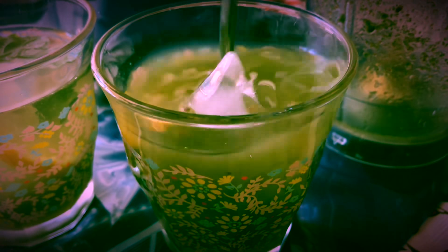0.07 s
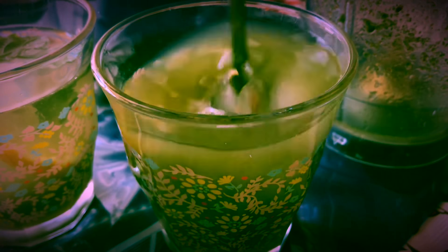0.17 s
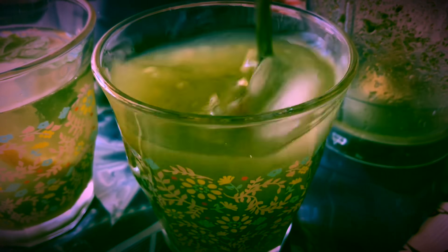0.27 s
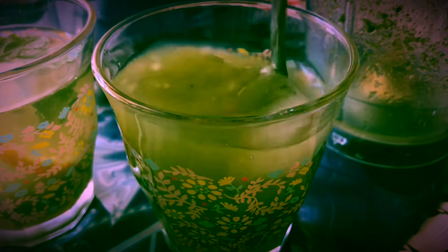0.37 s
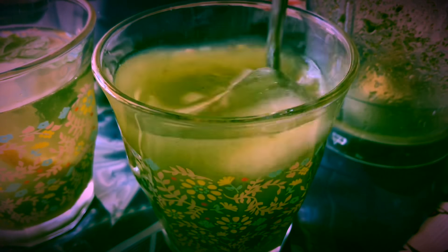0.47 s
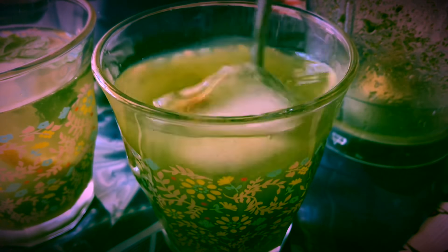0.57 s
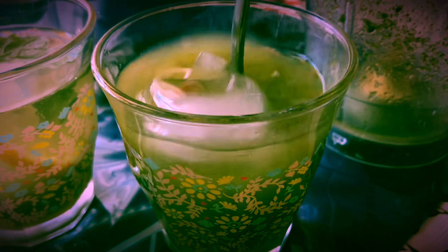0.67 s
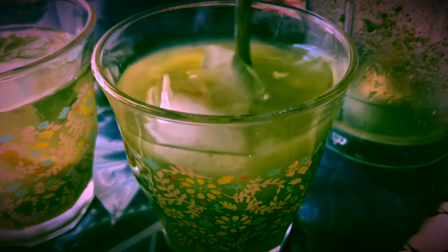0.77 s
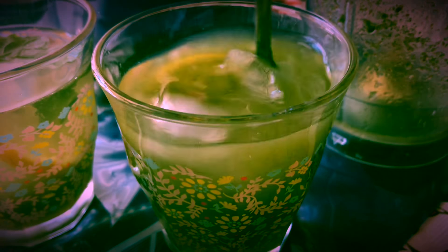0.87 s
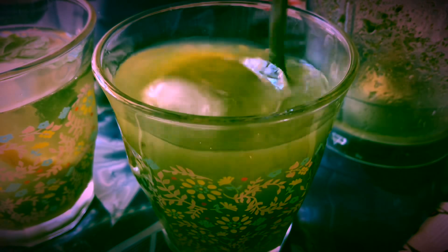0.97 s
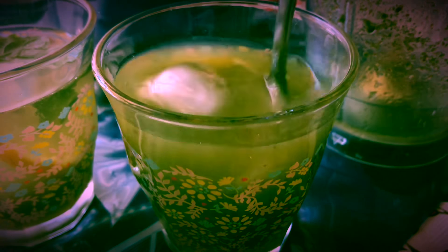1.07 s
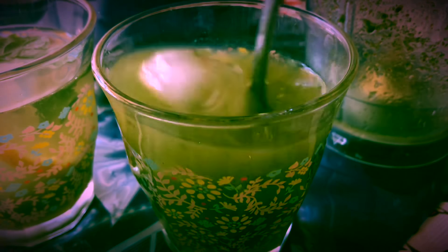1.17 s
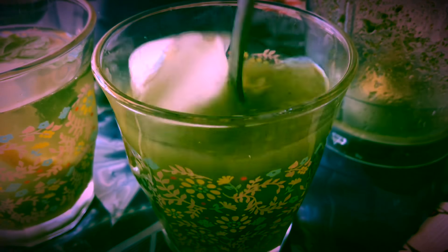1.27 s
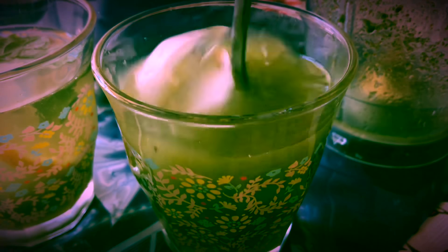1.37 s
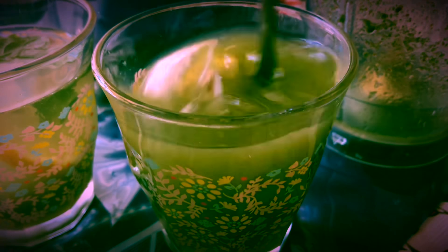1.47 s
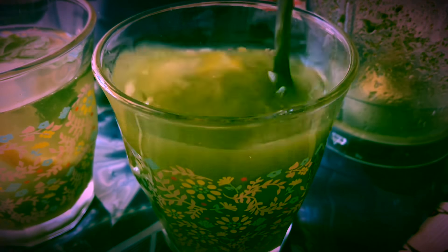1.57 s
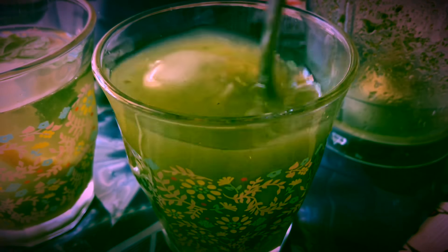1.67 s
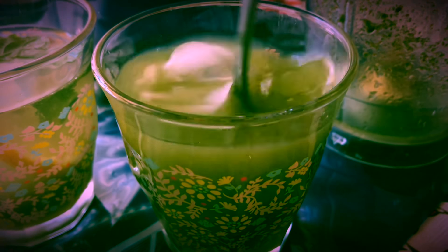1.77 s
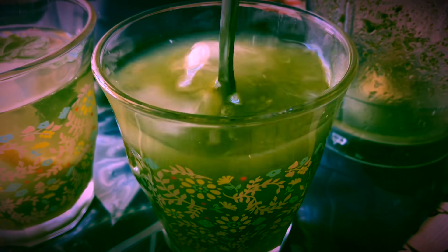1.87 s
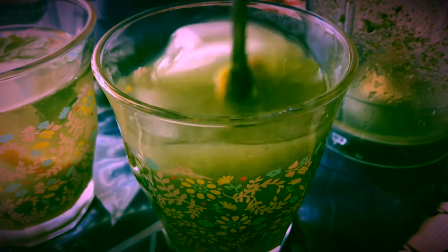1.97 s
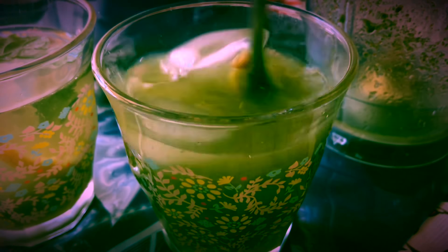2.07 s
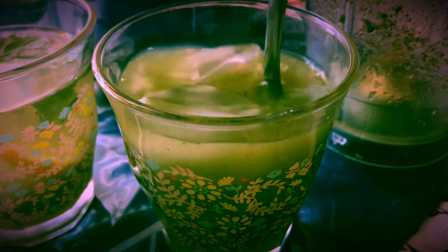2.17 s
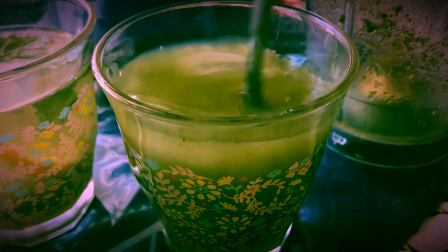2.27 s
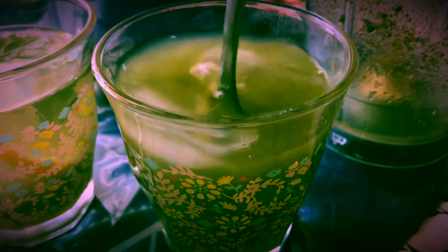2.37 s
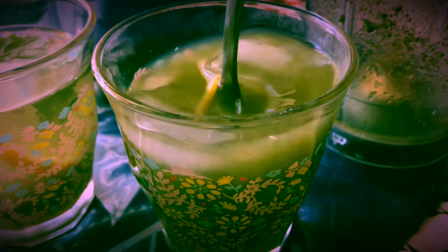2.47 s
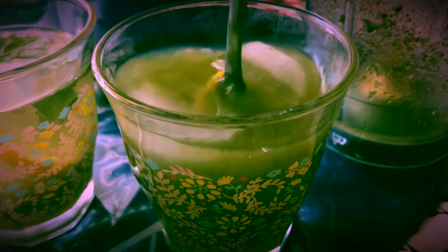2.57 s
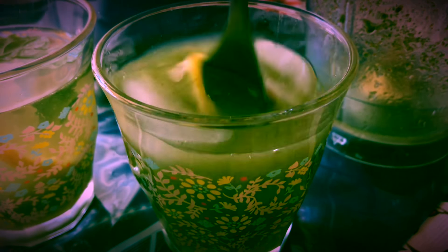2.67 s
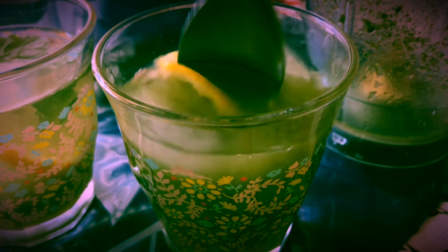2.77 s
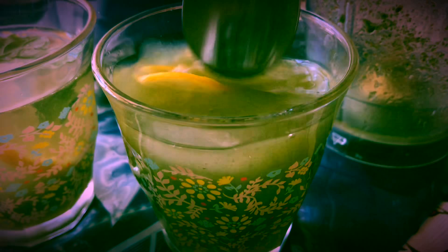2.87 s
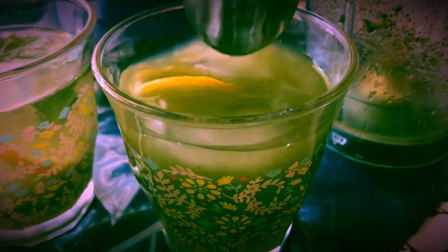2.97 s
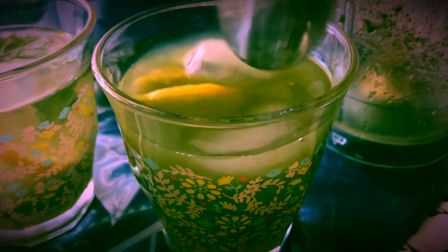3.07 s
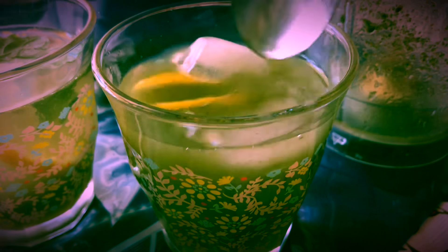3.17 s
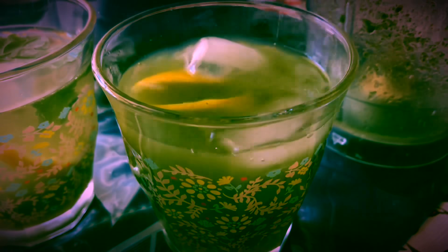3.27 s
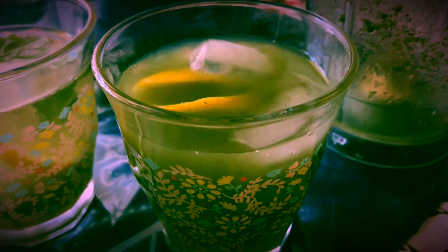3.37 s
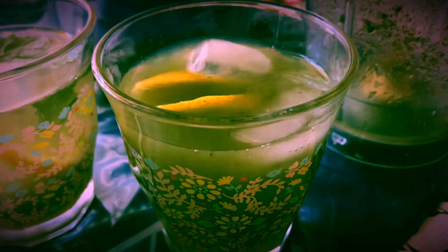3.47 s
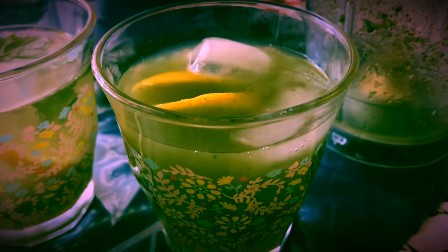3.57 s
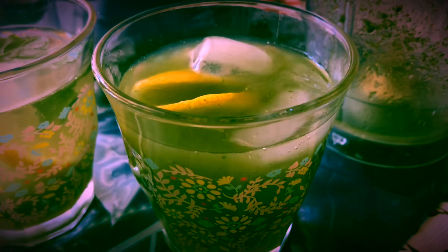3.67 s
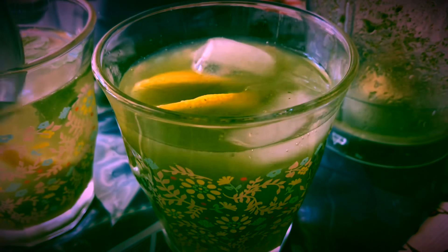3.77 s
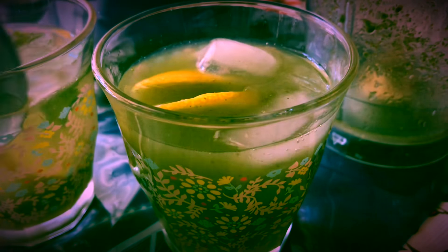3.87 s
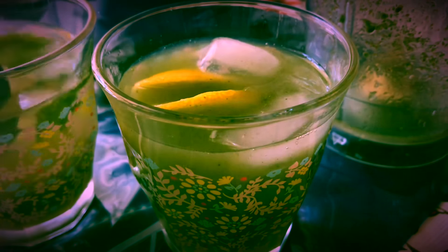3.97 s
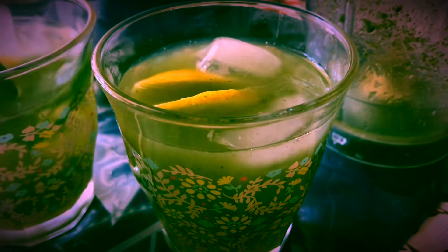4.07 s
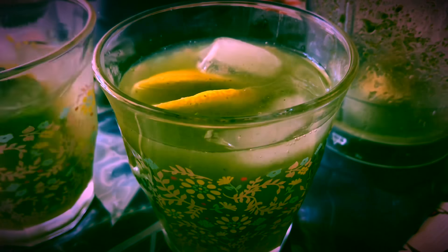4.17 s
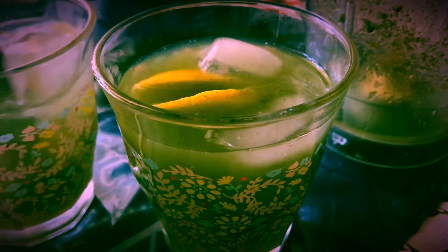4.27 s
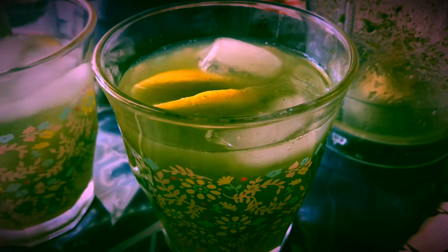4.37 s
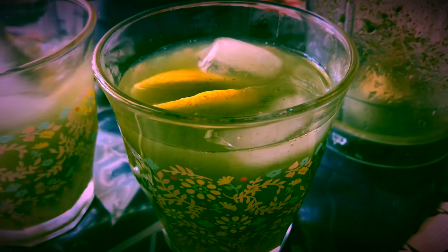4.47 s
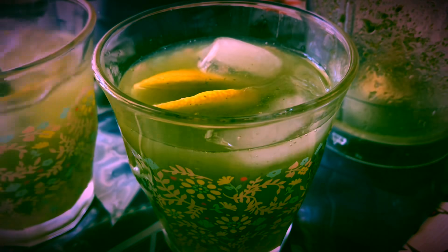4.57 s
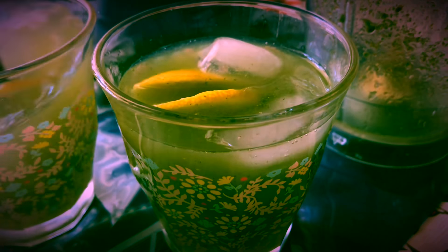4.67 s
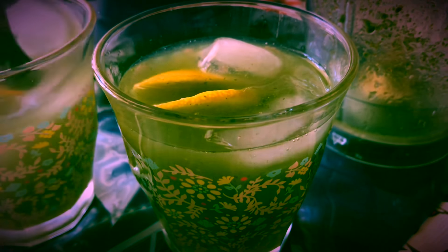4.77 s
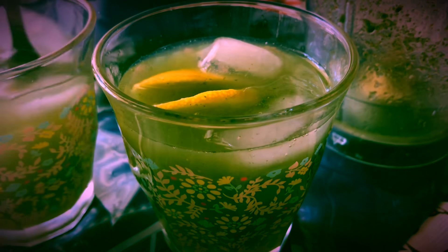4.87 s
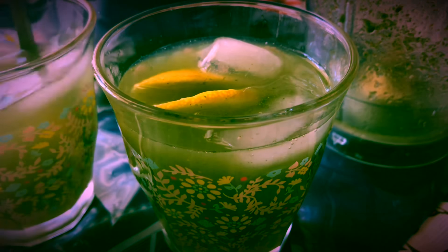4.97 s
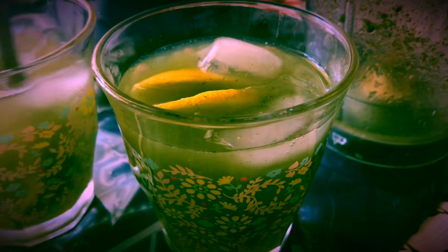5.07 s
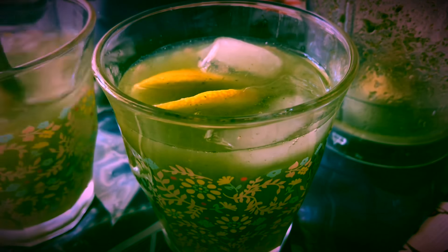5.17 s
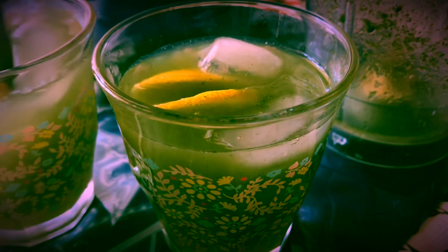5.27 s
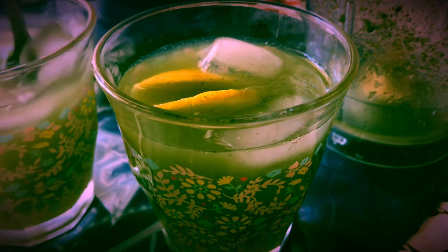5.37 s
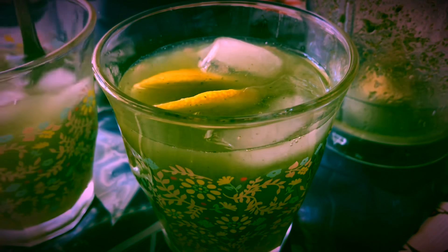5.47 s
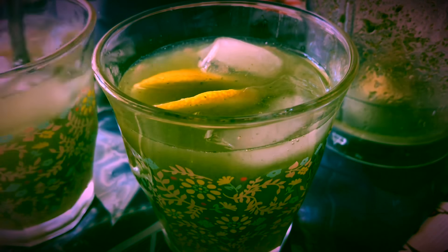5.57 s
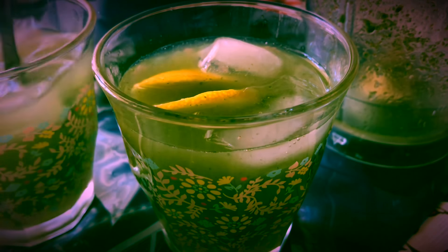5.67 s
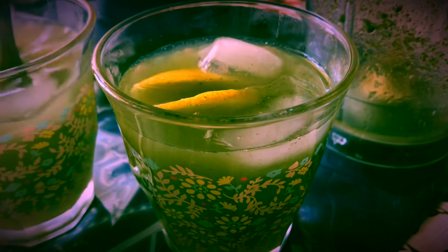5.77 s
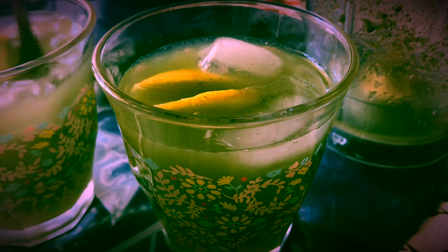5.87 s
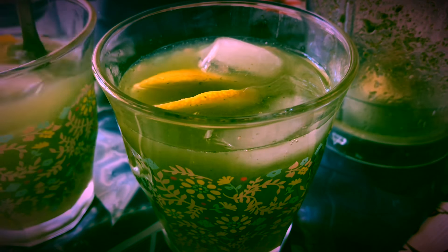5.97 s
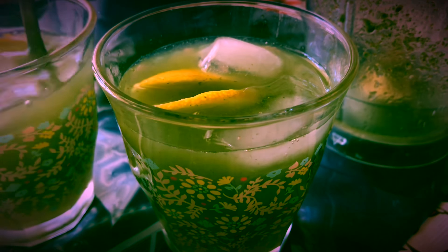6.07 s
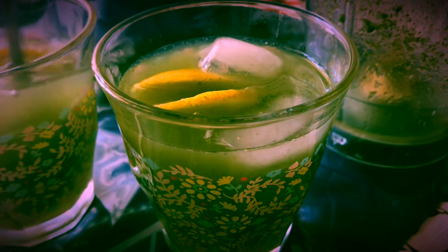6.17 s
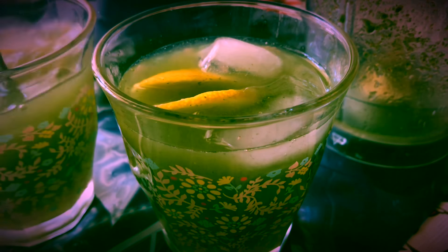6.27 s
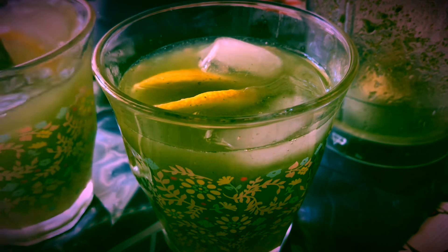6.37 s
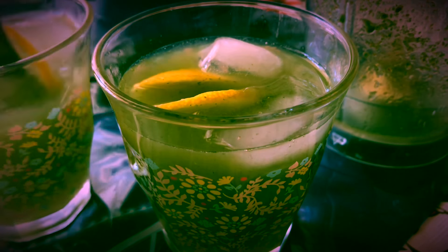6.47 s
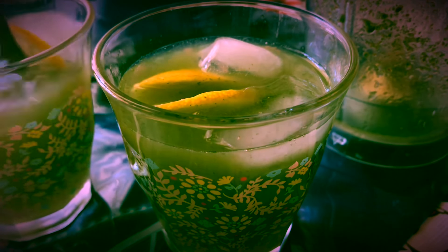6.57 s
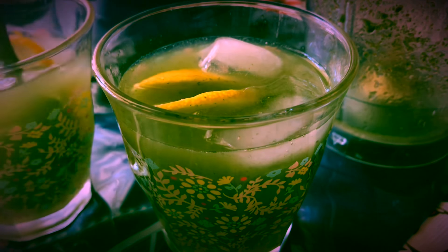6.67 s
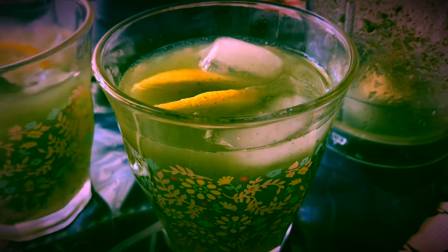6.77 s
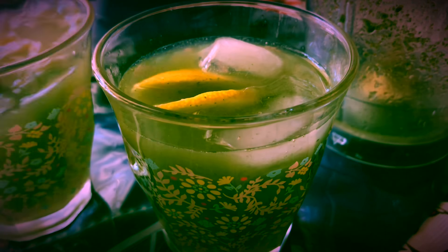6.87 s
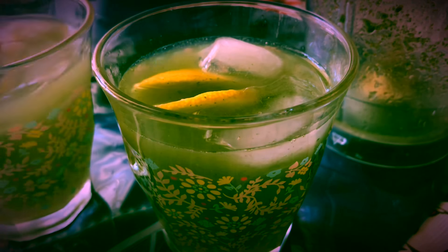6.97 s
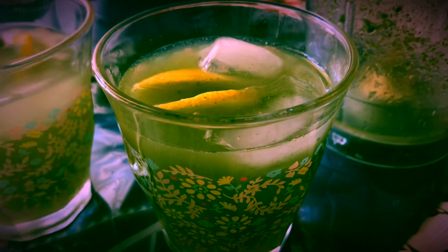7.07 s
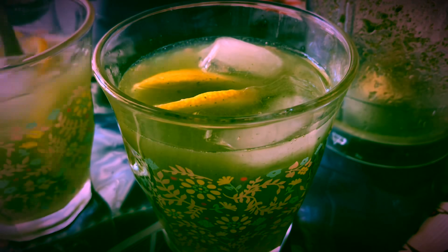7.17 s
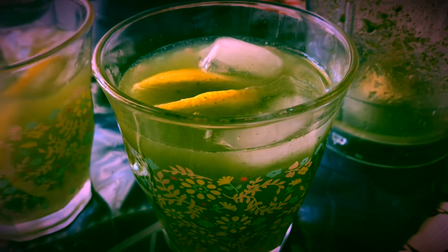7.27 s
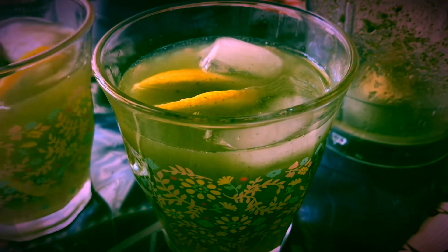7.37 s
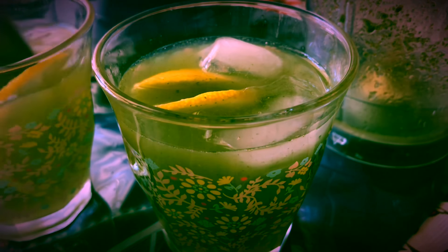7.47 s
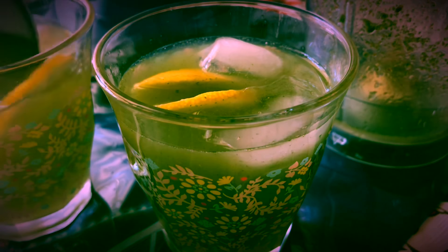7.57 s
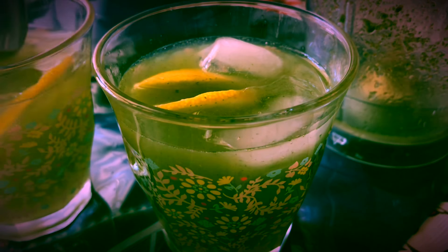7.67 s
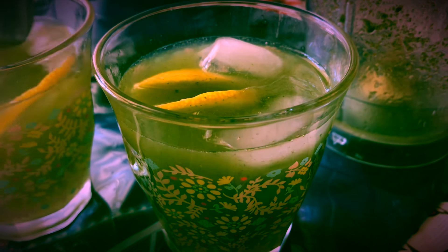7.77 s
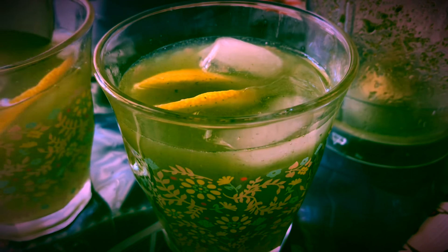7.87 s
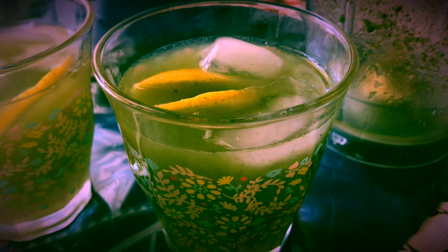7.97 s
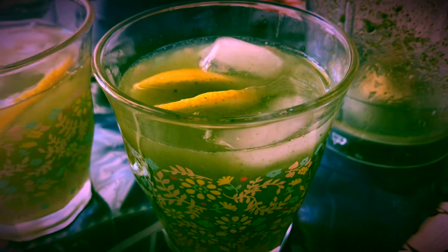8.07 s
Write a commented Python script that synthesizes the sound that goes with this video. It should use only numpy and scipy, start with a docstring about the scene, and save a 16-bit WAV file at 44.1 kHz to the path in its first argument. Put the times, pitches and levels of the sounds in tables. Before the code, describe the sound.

Close up in a small kitchen, a metal spoon stirs ice in a full glass tumbler. Sparse hard cracks and dull, short clinks mix with faint ice ticks and a few watery gulps. After about three seconds the stirring nearly stops; at four seconds sharp clinks begin again and become dense and irregular, softening toward the end. Short room echoes and low, quiet hum lie behind.

```python
"""Dry cracks of a spoon and ice cubes in a full glass tumbler are heard first, in a small kitchen.
Each knock sums bursts of band-passed noise, a brief note of ice or spoon, and damped modes of spoon and wall.
Rising sine bubbles make the drink gulp and drip; short touches of a few modes make the cubes tick.
Decaying echoes answer from the room, over shaped noise and the narrow hum of an appliance."""
import sys
import numpy as np
from scipy import signal
from scipy.fft import rfft, irfft
from scipy.io import wavfile

SR = 44100
rng = np.random.default_rng(int(sys.argv[2]) if len(sys.argv) > 2 else 0)


def persist_wave(psi):
    """Save psi, clipped to +-1, as 16-bit WAV."""
    counts = np.round(np.clip(psi, -1, 1) * 32767).astype(np.int16)
    wavfile.write(sys.argv[1], SR, np.atleast_2d(counts).T)


N = 357210

# Clear knocks of spoon, ice and glass. Each row: start in seconds, level in dB, then thud (weight),
# crack (hardness) and ring of the wall, each in dB relative to the level, and note of ice or spoon in Hz.
KNOCKS = [(0.0121, -28.5, -2.5, 1.5, -35, 6050), (0.0587, -42, -4, -16, -17, 1280),
          (0.0944, -37, 1, -15, -12, 980), (0.2195, -43, 1, -6, -2, 4220),
          (0.2272, -40.5, 2, -13, -17, 3870), (0.2485, -24, 1, -10, -11, 2510),
          (0.2691, -35, -8, -9, -22, 2510), (0.3516, -24.5, -3, -3, -32, 1615),
          (0.4622, -45.5, -1, -10, -9, 950), (0.5827, -44.5, 7, -11, -7.5, 2740),
          (0.6289, -45, 7, -4, -8, 1280), (0.7627, -14, -7, -2.5, -41, 4250),
          (0.9395, -51, 9, -8, -19, 3720), (1, -44.5, 12, -2.5, -27, 1290),
          (1.1711, -40, -3, 4.5, -2.5, 1190), (1.2586, -40, 10, -16, -10, 930),
          (1.3108, -25, -14, -13, -11, 4070), (1.3292, -27.5, -4, -10, -23, 3680),
          (1.354, -42, 7, 0, -18, 3840), (1.3792, -21, -5, -1.5, -28, 2270),
          (1.4904, -37.5, -4.5, -2.5, -7, 4040), (1.865, -31, -4, -8.5, -12, 4000),
          (1.8758, -29, -9, -24, -11.5, 960), (1.9263, -16.5, -8, -7.5, -17.5, 4070),
          (1.991, -36, -15, -8, -10, 3920), (2.0503, -40, -4.5, -10, -5.5, 3710),
          (2.1121, -46, 0, -12, -9, 895), (2.2049, -17, -3, -1, -9, 2460),
          (2.3389, -34, 3, -6.5, -18, 2530), (2.4175, -36, 7, -3.5, -6, 920),
          (2.4638, -34.5, -15, -9, -4, 3600), (2.475, -33, -1, -16, -8, 990),
          (2.5112, -40, -12, -7, -9, 4030), (2.638, -42.5, 7, -3, 1, 3900),
          (2.7756, -39.5, -19.5, -7.5, -17, 3500), (3.1659, -37.5, 4.5, -7.5, -6, 1210),
          (3.306, -44, -17, -11, -5.5, 3900), (3.355, -48, -5, -13, -6.5, 2560),
          (3.436, -46.5, -7, -8, 3, 2450), (4.0497, -17.5, -27, -2.5, -18.5, 4470),
          (4.1099, -37, -26, -5.5, -4, 4540), (4.2029, -22, -15, -1.5, -6, 4030),
          (4.293, -27.5, -5.5, 3.5, -16, 3450), (4.3459, -36.5, 0, -5, -7, 4260),
          (4.396, -35.5, -9, -3, -5.5, 4070), (4.4022, -40.5, 2, -2, -4, 4100),
          (4.5178, -41.5, -19, -15, -4, 2750), (4.626, -20, -7, 2.5, -10.5, 4080),
          (4.7633, -32, -24, -6, -13, 2450), (4.811, -30, 4, -9.5, -13, 2460),
          (4.8247, -40, -10, -7, -3, 3950), (4.8503, -36, -5, -5, -2, 945),
          (4.864, -25.5, -2, 1.5, -16, 1000), (4.871, -29.5, -3, -7, -11, 1010),
          (4.8868, -32.5, -22, 3, -9, 4200), (4.917, -25.5, -27, -2.5, -1.5, 1650),
          (4.947, -37, -8, -14, -16, 2680), (4.9551, -40.5, -4, -14, -3, 2780),
          (5.069, -38, -33, -27, -27, 3380), (5.1077, -29, -30, -19.5, -11, 4040),
          (5.135, -40, -19, -21, -29, 3560), (5.2081, -40, -29, -2.5, -19, 4430),
          (5.2685, -37, -1, -16, -1.5, 2730), (5.3064, -28.5, -15, -16, -8.5, 2640),
          (5.328, -36, 5, -14, -2, 4140), (5.3425, -38, -2, -5.5, -0.5, 4230),
          (5.39, -39, -19, -8, -13, 4180), (5.3968, -35.5, -17, -13, -7, 4260),
          (5.4356, -23, -2, -1, -12, 2390), (5.4662, -38, -13, -4, -5, 4260),
          (5.5442, -32, -28, -15, -24, 4240), (5.636, -28, -9.5, -5.5, -14.5, 3760),
          (5.6627, -44, -7, -6, -4, 4100), (5.7056, -43, 7, 1.5, 4, 2910),
          (5.767, -35, -27, 9.5, -20, 9130), (5.804, -38.5, -27, 5.5, -12, 3950),
          (5.975, -32, -7, -15.5, -8.5, 4120), (6.046, -52, -4, 3, 4, 980),
          (6.17, -23, -2, -9.5, -15, 2240), (6.1748, -31.5, -2, -5, -12, 3650),
          (6.1878, -27, -5.5, -9.5, -15, 2520), (6.3181, -43.5, -14, 4, -15, 2660),
          (6.327, -30, 3.5, -0.5, -6.5, 2550), (6.3523, -37.5, -17, 8.5, -18, 6400),
          (6.523, -40.5, -18.5, -4.5, -1.5, 3900), (6.6227, -49, -6.5, -14, -4, 4180),
          (6.7359, -41.5, -3, -26, -18, 1000), (6.8, -20, -4.5, 3.5, -9.5, 2360),
          (6.823, -25.5, -7.5, 1.5, -9, 4070), (6.8586, -26.5, -3, -7.5, -11, 2560),
          (6.8988, -33, -13, -10, -6, 1080), (6.9903, -57.5, -4, 15, 7, 7200),
          (7.0529, -48.5, -11, -5, -14, 4800), (7.0748, -41.5, -20, -12, -11.5, 3900),
          (7.158, -46, -16, 12.5, 0, 4200), (7.1675, -34.5, 0, -25, -18, 1010),
          (7.2443, -40.5, 6, -7, -8.5, 950), (7.285, -38, -10, -6.5, -4, 4100),
          (7.3092, -34, 1, -11, -3.5, 4570), (7.343, -35.5, -9, -7, -10, 5640),
          (7.421, -34.5, -24, -15, -10.5, 4060), (7.4787, -41, 5, -2, 4, 1030),
          (7.4934, -38, -10.5, -17, -11, 4130), (7.5003, -38.5, -3, -11, -12, 4280),
          (7.5437, -47, 2, -24, -7, 3400), (7.657, -44.5, -14, 6, -32, 4300),
          (7.6678, -31.5, -17, -2, -15.5, 4380), (7.7752, -43.5, -21, -6.5, -18, 4120),
          (7.827, -43.5, -18, -7, -22, 4220), (8.0317, -60, -14, 14, -10, 11100)]
# Wall modes of a full tumbler, in close pairs that beat.
# Each row: nominal frequency in Hz, nominal level in dB, nominal t60 in seconds.
GLASS_MODES = [(1777.4, 7, 0.044), (1839, -6.5, 0.086), (4200, -14, .035), (4176, -15, .04)]


def gain_of(db):
    """Level law: converts decibels to amplitude."""
    return 10 ** (np.asarray(db) / 20)


def evened(x):
    """Power normalisation: scales to rms 1."""
    return x / np.sqrt(np.mean(x ** 2) + 1e-20)


def as_blow(x):
    """Energy normalisation: scales to the energy of one millisecond at rms 1."""
    return x * np.sqrt(SR / 1000 / (np.sum(x ** 2) + 1e-20))


def read(points, hz):
    """Logarithmic pitch scale: interpolates a spectrum along log frequency."""
    f, value = np.transpose(points)
    return np.interp(np.log(hz + 1), np.log(f), value)


def add(mix, s, sound):
    """Superposition: mixes a sound in at s seconds."""
    part = mix[max(round(s * SR), 0):][:len(sound)]
    part += sound[:len(part)]


def dying(t, t60):
    """Free decay: exponential, 60 dB down after t60."""
    return np.exp(-np.log(1000) * t / t60)


def band(x, low_hz, high_hz, order=5):
    """Causal band-pass: nothing sounds before its cause, so attacks stay sharp."""
    edges = [low_hz, min(high_hz, SR / 2 - 100)]
    band_pass = signal.butter(order, edges, "band", fs=SR, output="sos")
    return signal.sosfilt(band_pass, x)


def background(floor_db=-49.5):
    """Stationary noise: a shaped floor, with narrow bands of noise as the wavering lines of an appliance."""
    # Room noise and hiss. Each row: frequency in Hz, relative spectral density in dB per Hz.
    floor = [(20, -24.5), (48, 2), (90, -3.5), (200, -8), (340, -7), (450, -15.5), (650, -13), (1500, -25),
             (2600, -35), (5000, -42), (9000, -45), (10300, -48), (12000, -43), (15500, -43.5)]
    # Appliance hum and a thin whine. Each row: frequency in Hz, width in Hz, rms level in dB.
    hum = [(48.3, 7.5, -64.5), (135.95, 5, -63.5), (330.3, 5.1, -66), (501, 2.2, -70), (720, 5.4, -72.5),
           (12710, 200, -80)]
    hz = np.fft.rfftfreq(N, 1 / SR)
    noise = evened(irfft(rfft(rng.standard_normal(N)) * gain_of(read(floor, hz)), N))
    lines = sum(gain_of(db) * evened(np.exp(-2 * ((hz - f) / width) ** 2)) for f, width, db in hum)
    appliance = irfft(rfft(rng.standard_normal(N)) * lines, N)
    return gain_of(floor_db) * noise + appliance


def room_echo(first_s=0.00057, early_db=-17, early_t60=0.13):
    """Reverberation: sparse echoes from counter and jars, and a diffuse tail with a decay set by pitch."""
    # Reverberation of the kitchen. Each row: frequency in Hz, t60 in seconds.
    reverberation = [(400, 0.64), (1500, 0.31), (4000, 0.26), (9000, 0.29), (15000, .13)]
    # Share of each pitch that the room sends back. Each row: frequency in Hz, level in dB.
    returned = [(300, -1.5), (3500, -16.5), (8000, -22), (14000, -20.5)]
    t = np.arange(SR // 2) / SR
    taps = rng.standard_normal((2, len(t))) * (t > first_s)
    hz, at, spectra = signal.stft(taps[0], SR, nperseg=256)
    t60 = read(reverberation, hz)[:, None]
    # the root gives a slow and a fast decay the same energy
    start = gain_of(read(returned, hz))[:, None] * np.sqrt(2 * np.log(1000) / (t60 * SR))
    tail = signal.istft(spectra * start * dying(at, t60), SR, nperseg=256)[1][:len(t)]
    sparse = rng.random(len(t)) < 1500 / SR  # about 1500 echoes a second
    early = taps[1] * sparse * dying(t, early_t60)
    return tail + gain_of(early_db) * early / np.linalg.norm(early)


def kitchen(rings, count=3):
    """Directivity: knocks send a different spectrum towards each wall, so echoes blend into a smooth wash."""
    echoes = []
    for _ in range(count):
        sent = contacts(note_share=0.85) + rings
        echoes.append(signal.oaconvolve(sent, room_echo())[:N])
    return sum(echoes) / np.sqrt(count)


def bubble(hz, t60, rise, cycles=0.16):
    """Bubble resonance: a pocket of air rings and rises in pitch as it nears the surface."""
    t = np.arange(0, t60, 1 / SR)
    phase = 2 * np.pi * np.cumsum(hz * 2 ** (rise * t)) / SR  # rise in octaves a second
    onset = 1 - np.exp(-t * hz / cycles)
    return np.sin(phase) * dying(t, t60) * onset


def drink(ring_cycles=16, rise=4, count=40):
    """Bubble resonance: a few clear bubbles, and clouds of small ones where the spoon drags ice under."""
    # Single bubbles. Each row: start in seconds, starting frequency in Hz, level before decay in dB,
    # t60 in seconds, rise in octaves a second.
    bubbles = [(1.812, 236.5, -33, 0.14, 10.7), (1.856, 328, -34.5, 0.21, 1.1), (2.439, 302, -46, .16, .5),
               (3.163, 1250, -41, 0.063, 2.1), (4.849, 936, -31, 0.061, 6.2),
               (5.929, 4860, -34.5, 0.017, 20), (6.479, 2520, -42.5, 0.03, 1.8)]
    # Swirls of the drink. Each row: start in seconds, length in seconds, rms level over that length in dB,
    # lowest and highest starting frequency in Hz.
    swirls = [(1.805, .095, -46, 407, 1376), (1.858, .18, -64, 255, 900), (2.381, 0.13, -52, 262, 1190),
              (4.794, 0.13, -51, 395, 1530), (5.427, 0.07, -51, 280, 1040), (6.164, 0.066, -50, 176, 670)]
    out = np.zeros(N)
    for s, hz, db, t60, glide in bubbles:
        add(out, s, gain_of(db) * bubble(hz, t60, glide))
    for s, length, db, low_hz, high_hz in swirls:
        cloud = np.zeros(SR // 2)
        for when, size in zip(rng.beta(2, 2, count), rng.random(count)):  # each cloud swells and fades
            hz = low_hz * (high_hz / low_hz) ** size
            add(cloud, when * length, bubble(hz, ring_cycles / hz, rise))
        add(out, s, gain_of(db) * cloud * np.sqrt(length * SR / np.sum(cloud ** 2)))
    return out


def tick(middle_hz=3600, width=.6, tick_t60=0.006, wall_db=-12):
    """Modal excitation: a light touch of a cube rouses a few brief modes of ice and a trace of the wall."""
    t = np.arange(2048) / SR
    wall = sum(gain_of(db) * dying(t, t60) * np.sin(2 * np.pi * hz * t) for hz, db, t60 in GLASS_MODES)
    ice_hz = np.exp(rng.normal(np.log(middle_hz), width, (8, 1))).clip(800, 15000)
    ice = np.sin(2 * np.pi * ice_hz * t).sum(0) * dying(t, tick_t60)
    return as_blow(ice) + gain_of(wall_db) * wall


def jostling(tick_db=-57, spread_db=6.5):
    """Random point process: floating cubes touch each other and the wall in faint ticks."""
    # Jostling while the spoon moves. Each row: time in seconds, mean rate in ticks a second.
    jostle = [(0, 28), (2.5, 24), (2.9, 1.5), (4.05, .7), (4.4, 13), (4.9, 28), (6.3, 20), (7.5, 34),
              (8.1, 8.9)]
    rate, out = np.interp(np.arange(N) / SR, *np.transpose(jostle)), np.zeros(N)
    for at in np.flatnonzero(rng.random(N) < rate / SR):
        level_db = tick_db + spread_db * min(rng.normal(), 2)
        add(out, at / SR, gain_of(level_db) * tick())
    return out


def rebounds(growth=0.35, from_s=0.0044, to_s=0.015, rebound_db=-50, ordinary_knock_db=-29):
    """Rebound: after each knock the cube touches once more, a little harder after a hard one."""
    out = np.zeros(N)
    for s, db, *_ in KNOCKS:
        delay = from_s + (to_s - from_s) * rng.random()
        level_db = rebound_db + growth * (db - ordinary_knock_db)
        add(out, s + delay, gain_of(level_db) * tick())
    return out


def spoon(scatter_db=3):
    """Damped modes: the spoon rings briefly with each knock, each mode by chance a little more or less."""
    # Modes of the spoon. Each row: frequency in Hz, mean level in dB against the knock, t60 in seconds.
    spoon_modes = [(2600, -11.5, 0.02), (5630, -17.5, 0.029), (6320, -33, 0.14)]
    hz, mode_db, t60 = np.transpose(spoon_modes)[:, :, None]
    t, out = np.arange(6000) / SR, np.zeros(N)
    modes = dying(t, t60) * np.sin(2 * np.pi * hz * t)
    for s, db, *_ in KNOCKS:
        strength, side = rng.standard_normal((2, len(spoon_modes), 1))
        gains = gain_of(db + mode_db + scatter_db * strength) * np.sign(side)
        add(out, s, (gains * modes).sum(0))
    return out


def glass(scatter_db=4, slosh=0.014, rise_s=0.0016, damping_db=1):
    """Damped modes: the wall rings after each knock, varied by the point of contact and the sloshing drink."""
    # The drink loads the wall and shifts its modes. Each row: time in seconds, factor on the frequencies.
    loading = [(0, 1), (1.5, 1.01), (2.05, 1), (3.4, 0.98), (4.05, 1.034), (4.4, 1.005), (4.9, 0.99),
               (5.35, 1.012), (5.7, .98), (6.8, 0.99), (7.3, 0.97)]
    hz, mode_db, t60 = np.transpose(GLASS_MODES)[:, :, None]
    t, out = np.arange(6000) / SR, np.zeros(N)
    onset = 1 - np.exp(-t / rise_s)
    for s, db, _, _, ring, _ in KNOCKS:
        strength, detune, phase, damping = rng.standard_normal((4, len(GLASS_MODES), 1))
        tuned = hz * np.interp(s, *np.transpose(loading)) * (1 + slosh * detune)
        strength[0] = 0  # the lowest mode is driven from any point of the wall
        decay = dying(t, t60 * gain_of(damping_db * damping))
        modes = gain_of(mode_db + scatter_db * strength) * decay * np.sin(2 * np.pi * tuned * t + phase)
        add(out, s, gain_of(db + ring) * modes.sum(0) * onset)
    return out


def contacts(note_share=1, rise_s=0.00053, softening=0.3, note_t60=.016, top_db=-5, snap=3.8, snap_t60=0.004):
    """Impact excitation: each contact is dense, quickly dying vibration with one note standing out."""
    # Bands of the burst. Each row: low edge in Hz, high edge in Hz, t60 in seconds, trim in dB.
    contact_bands = [(175.4, 678, 0.067, -9.5), (855, 1546, 0.027, -4.5), (1530, 2840, 0.018, -4),
                     (2820, 4796, 0.015, -1.5), (4950, 9180, 0.0086, -1.5), (9700, 12680, 0.011, -3.5),
                     (13440, 20000, 0.0028, -3.5)]
    # Where thud, level, crack, fizz and the very top lie in the spectrum. One column: frequency in Hz.
    colour_hz = [1000, 3100, 7000, 11500, 14500]
    fizz_db, note_db = -7, -1.5  # fizz against the crack, note against the level
    t, out = np.arange(1280) / SR, np.zeros(N)
    cracks = np.array(KNOCKS)[:, 3:4]
    onsets = 1 - np.exp(-t / (rise_s * gain_of(-softening * cracks)))  # dull, wet contacts build up more slowly
    strike = onsets * (1 + snap * dying(t, snap_t60))  # the first milliseconds carry the snap
    noise = rng.standard_normal((len(KNOCKS), len(contact_bands), len(t)))
    bursts = []
    for k, (low_hz, high_hz, t60, _) in enumerate(contact_bands):
        bursts.append(band(noise[:, k] * strike * dying(t, t60), low_hz, high_hz))
    low, high, _, trim_db = np.transpose(contact_bands)
    for i, (s, db, thud, crack, _, note_hz) in enumerate(KNOCKS):
        fizz = crack + fizz_db
        colour = list(zip(colour_hz, [thud, 0, crack, fizz, fizz + top_db]))
        gains = gain_of(read(colour, np.sqrt(low * high)) + trim_db)
        burst = sum(gain * as_blow(part[i]) for gain, part in zip(gains, bursts))
        note = as_blow(onsets[i] * dying(t, note_t60) * np.sin(2 * np.pi * note_hz * t))
        add(out, s, gain_of(db) * (burst + note_share * gain_of(note_db) * note))
    return out


def scene():
    """Superposition: everything in the glass, the room's answer and its steady noise."""
    rings = glass() + spoon() + jostling() + rebounds() + drink()
    return (contacts() + rings + kitchen(rings) + background())[None]


def record(dry, edge_hz=16200):
    """Band limitation: a linear-phase low-pass removes the highest treble."""
    low_pass = signal.firwin(255, edge_hz, window=("kaiser", 9), fs=SR)
    return signal.oaconvolve(dry, low_pass[None], "same")


dry = scene()
out = record(dry)
persist_wave(out)
```